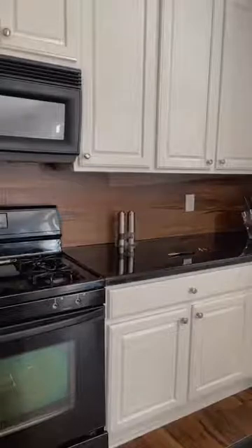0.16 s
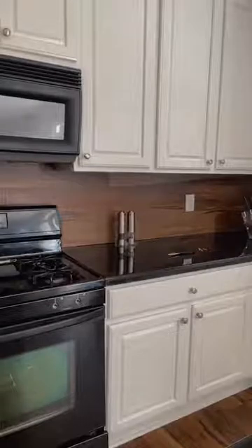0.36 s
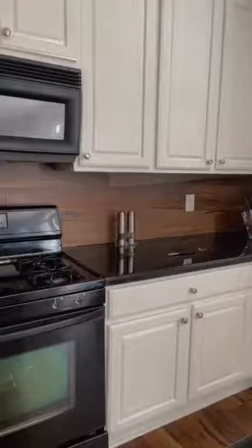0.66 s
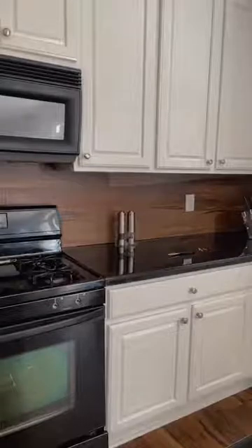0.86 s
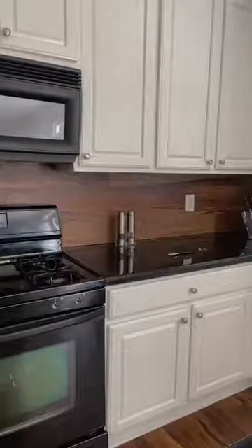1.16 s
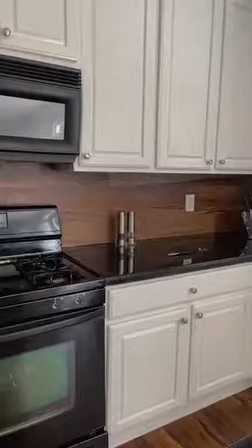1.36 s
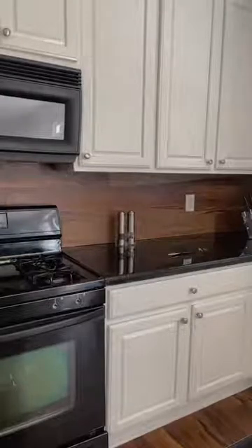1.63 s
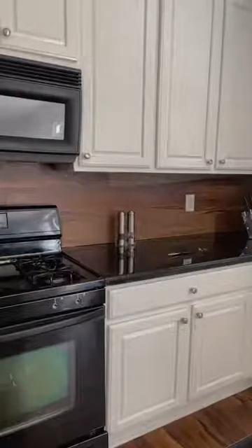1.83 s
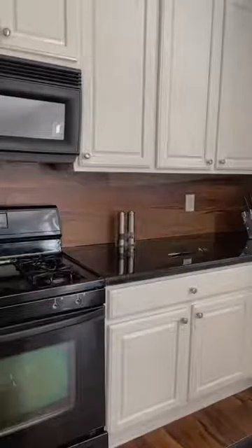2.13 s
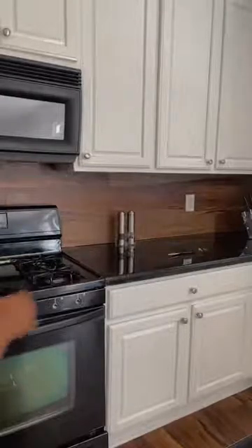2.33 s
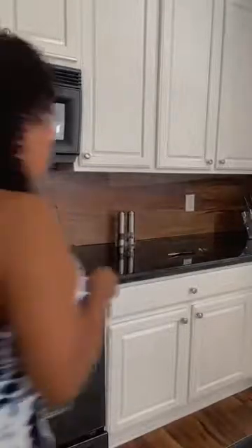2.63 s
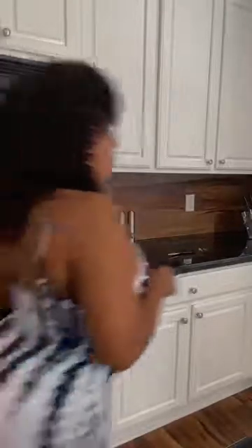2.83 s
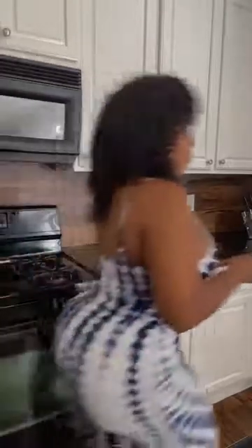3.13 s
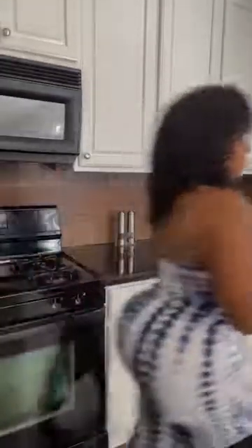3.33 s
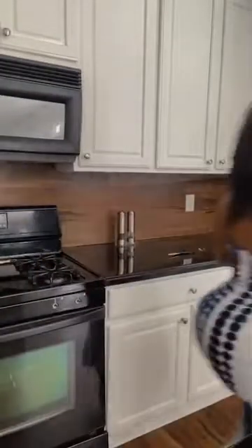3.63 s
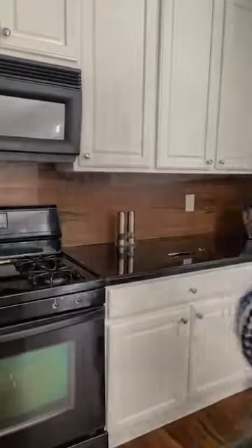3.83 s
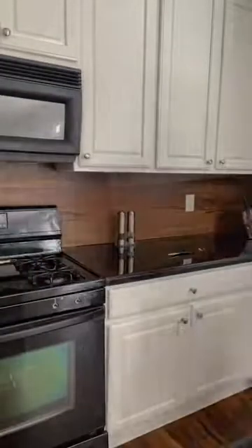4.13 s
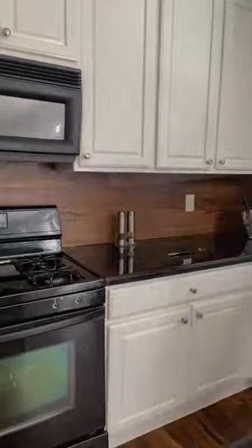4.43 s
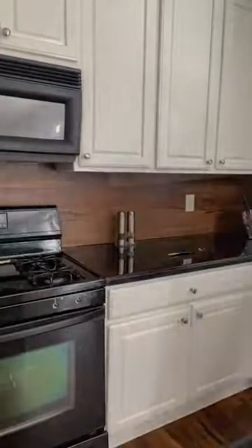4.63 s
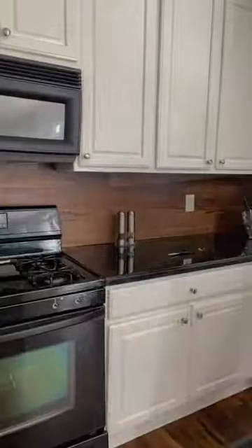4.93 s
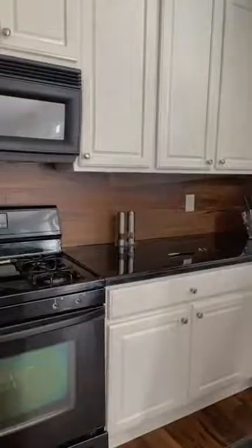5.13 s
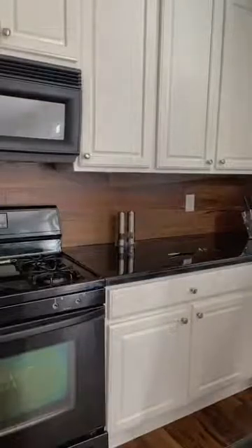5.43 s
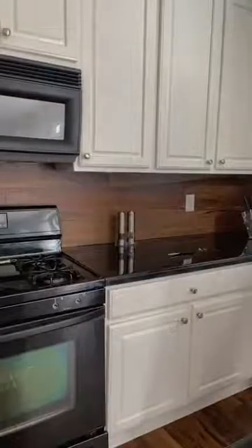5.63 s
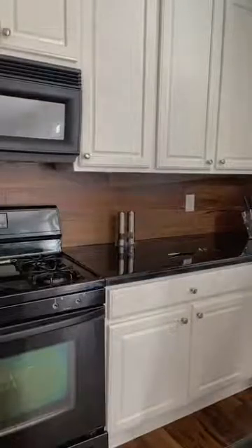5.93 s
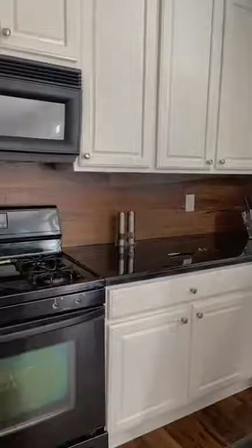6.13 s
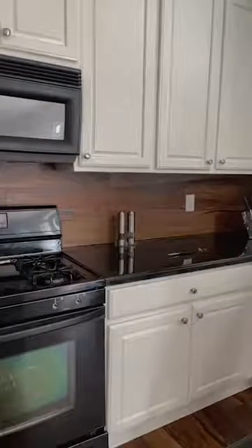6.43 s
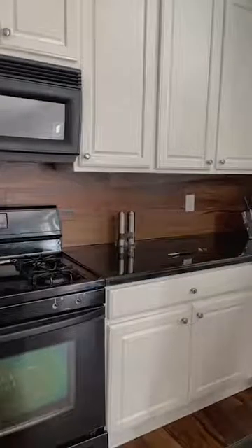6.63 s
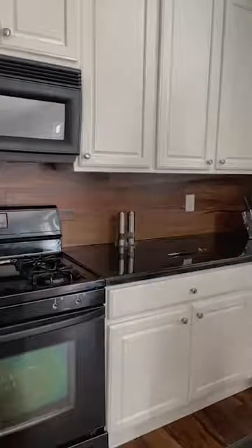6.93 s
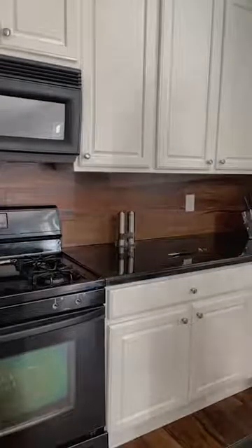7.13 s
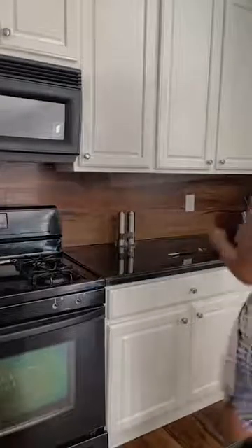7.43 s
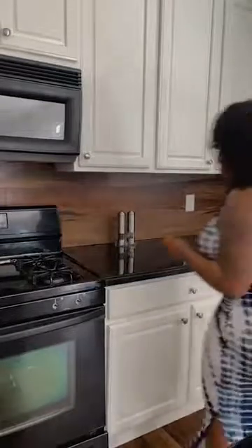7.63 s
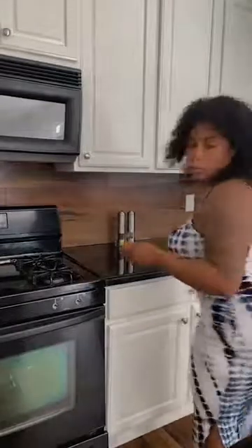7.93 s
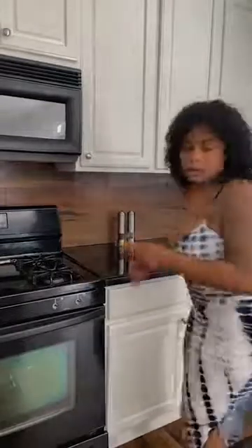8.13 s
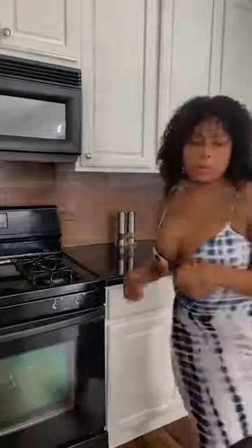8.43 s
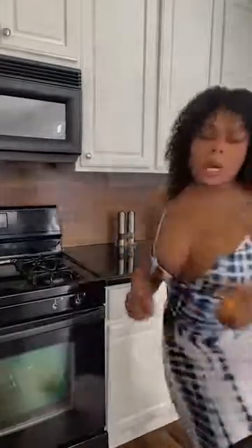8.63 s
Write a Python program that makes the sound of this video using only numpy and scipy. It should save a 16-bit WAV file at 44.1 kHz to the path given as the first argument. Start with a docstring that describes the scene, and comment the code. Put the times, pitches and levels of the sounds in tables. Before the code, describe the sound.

A door rattles at once, a hollow box is knocked over in a quick tumble, then two loud, bassy door bangs with rattling contact ring through a hard kitchen. Afterwards it falls nearly quiet: light slipper scuffs, a few airy swishes over a surface, faint metal chinks and small squeaky pips, over a low refrigerator hum and soft room air. The fixed microphone hears clear echo.

```python
"""A door rattles and a box is knocked over refrigerator hum and room air; two doors then bang and rattle.
Slippers walk about, something swishes over a surface, metal chinks faintly; short pips sound.
Doors and box: struck modes plus contact noise. Slippers and swishes: grainy noise, resonated.
Chinks and pips: noise-shaken decaying resonances. Hum: sine lines. Room air: coloured noise.
A hard-walled kitchen echoes all but the hum and the air."""
import sys
import numpy as np
from scipy import signal
from scipy.fft import rfft, irfft
from scipy.io import wavfile
from scipy.ndimage import uniform_filter1d

SR = 44100
rng = np.random.default_rng(int(sys.argv[2]) if len(sys.argv) > 2 else 0)


def waveform_to_disk(signal):
    """Save audio, clipped to [-1, 1], as 16-bit WAV at the path in sys.argv[1]."""
    frames = np.transpose(np.atleast_2d(signal))
    scaled = np.clip(frames, -1, 1) * 32767
    samples = np.round(scaled).astype(np.int16)
    wavfile.write(sys.argv[1], SR, samples)


N = 386310

# Spectrum levels are relative: coloured() sets the total to rms 1.
# door blows: start_s, push_db (relative), crack_re_push_db, rattle_s
DOOR_BLOWS = [(.002, -34.5, -6.5, 0.024), (0.037, -40, -6, 0.02), (0.091, -30.5, -14, 0.0062),
              (.126, -42, -17, 0.011), (.157, -42, -20, 0.0074), (.934, -26, 0.5, .026),
              (.952, -12.5, -10.5, 0.023), (.965, -15.5, -10.5, 0.014), (.986, -16.5, -11.5, 0.013),
              (.999, -22.5, -10, 0.0088), (1.033, -30.5, -18, 0.009), (1.049, -24.5, -16, 0.0082),
              (1.075, -27, -14, 0.011), (1.115, -33, -19, 0.011), (1.177, -39.5, 0, .016),
              (1.249, -35, -3.5, 0.018), (1.266, -25.5, -3.1, 0.016), (1.284, -29, 0.1, 0.028),
              (1.314, -21, -2, 0.0071), (1.335, -25, -2, .0059), (1.349, -33, 1, 0.0084),
              (1.389, -24.5, 0.8, 0.0068), (1.402, -26, -1.5, 0.011), (1.45, -42, -12, 0.011)]
# door panel modes: mode_hz, width_hz, level_db (relative)
PANEL_MODES = [(58, 52, 0), (89.5, 43, -2.5), (121.5, 28, 0), (198, 29, 0.5), (258, 53, -3),
               (325.6, 27.6, -1), (455, 50, -2.5), (509, 53, -0.5), (561, 26, 1.5), (799, 40, -5.5),
               (1294, 66, 0)]
# latch and edge contact spectrum: freq_hz, density_db_per_hz
CRACK_SPECTRUM = [(150, -9), (400, -3), (800, -4.5), (1300, -7.5), (2200, -8.5), (3500, -14), (7000, -22),
                  (9500, -25), (12000, -32.5), (15600, -36)]
# hollow knocks: start_s, strength_db, pitch_factor
BOX_KNOCKS = [(.222, -16.5, 1.03), (.284, -28.5, 1.24), (.327, -22.5, 1.07), (.412, -20, 0.577),
              (.41, -33.5, 1.78), (.47, -29, 1.01), (.475, -40.5, 1.84), (5.028, -34, 0.66)]
# box modes: mode_hz (before pitch_factor), level_db (relative), t60_s
BOX_MODES = [(328.7, 2, 0.098), (409.5, 7, 0.056), (589, -7, 0.071), (710, -13, 0.051), (1190, -21, 0.097)]
# slipper slaps and scuffs: start_s, strength_db, slap_hz, hiss_re_slap_db, hiss_hz, length_s
SLIPPER_STEPS = [(0.182, -68, 1500, -1.5, 11000, .01), (0.465, -52, 690, -9, 12000, 0.016),
                 (.593, -78, 900, 4.5, 14000, .015), (0.716, -64, 1600, 2, 5600, 0.019),
                 (1.58, -54, 900, 3, 8900, 0.017), (1.88, -58.5, 1330, 0.5, 6600, .016),
                 (2.192, -60, 1180, 0.5, 4540, 0.019), (2.272, -64, 845, 1, 5000, 0.012),
                 (2.444, -64, 1240, 4.5, 6750, 0.026), (2.866, -58.5, 1010, -8, 5130, 0.024),
                 (2.967, -65, 1170, -2, 4000, 0.021), (3.024, -48.5, 1400, 2, 3970, 0.007),
                 (3.414, -63, 1020, 2.5, 7900, 0.012), (3.433, -57, 800, -2.5, 5930, .013),
                 (3.453, -58.5, 1500, -3, 6200, 0.014), (3.529, -63.5, 2220, 1, 6840, .021),
                 (3.564, -65, 997, 7, 6000, 0.021), (3.717, -61, 750, -12, 4180, 0.01),
                 (3.958, -62, 820, -6.5, 3780, .036), (4.033, -61.5, 900, 0.5, 3560, .018),
                 (4.308, -58.5, 1320, 3, 3760, 0.019), (4.467, -71.5, 896, 5, 9000, 0.034),
                 (5.327, -59.5, 2500, 13, 9800, 0.013), (6.04, -49.5, 1400, -1, 4610, 0.0074),
                 (6.052, -50.5, 890, -2, 7340, 0.01), (6.597, -52, 990, -2.5, 4160, 0.007),
                 (6.876, -63, 988, -4.5, 8160, 0.012), (7.043, -62.5, 900, 9.5, 7340, 0.014),
                 (7.085, -67.5, 743, 5, 7300, 0.041), (7.136, -64, 1700, 2.5, 5660, 0.029),
                 (7.187, -60.5, 1200, 0.5, 7530, 0.015), (7.647, -60.5, 900, -1, 6960, 0.029),
                 (7.734, -71, 934, 15.5, 8000, 0.033), (7.827, -68, 1730, 16, 8080, .025),
                 (7.886, -81, 937, 15, 6970, 0.041), (8.085, -57.5, 980, 9, 6150, 0.018),
                 (8.202, -75.5, 864, 15, 7540, 0.023), (8.319, -64.5, 1320, 6.5, 8000, 0.025)]
# sliding sole spectrum: freq_hz, density_db_per_hz
SOLE_SPECTRUM = [(500, -5), (1500, -14.5), (3000, -2.5), (6800, -4.5), (9000, -4.5), (11000, -8.5),
                 (15600, -12.5)]
# strokes: start_s, rise_s, hold_s, fall_s, level_db, swell_over_hold_db,
#          rub_from_hz, rub_to_hz, fizz_re_rub_from_db, fizz_re_rub_to_db
STROKES = [(1.62, 0.05, 0.048, .08, -51.5, 3, 6800, 5300, 5.5, -13),
           (4.53, 0.053, 0.45, 0.16, -47.5, 3.5, 8000, 5530, -2.5, -25),
           (5.071, 0.055, 0.096, 0.15, -41.5, -5.5, 5300, 4800, -22, -24),
           (5.756, 0.064, 0.23, 0.011, -69.5, 8, 3380, 5360, -22, -20)]
# rubbed surface spectrum: freq_hz, density_db_per_hz
RUB_SPECTRUM = [(300, -6), (600, -14.5), (900, -9.5), (1550, -14), (1750, -6), (2050, -7), (2300, -7),
                (3000, -9.5), (4500, -5.5), (6800, -5.5), (9000, -6.5), (11000, -11), (15600, -17)]
# moments of pressure that scrape: start_s, level_db, length_s
SCRAPES = [(1.631, -56, 0.018), (4.872, -48.5, 0.032), (5.116, -45, 0.034), (5.268, -61, .04),
           (5.77, -65.5, .07)]
# metal chinks: start_s, strength_db, upper_re_lower_db
METAL_CHINKS = [(.6, -68, -12), (.64, -59, -4), (1.67, -64, 9), (1.712, -53, -7), (1.8, -60, -2)]
# lower and upper metal mode: mode_hz, width_hz, t60_s (of the envelope)
METAL_MODES = [(4430, 49, 0.18), (5380, 110, 0.23)]
# pips and squeaks: start_s, strength_db, pitch_hz, t60_s (of the envelope)
SHORT_PIPS = [(2.305, -54, 795, 0.1), (3.432, -50.5, 800, 0.12), (3.476, -60, 1750, .11),
              (5.335, -52.5, 3700, 0.42), (5.7, -60, 4000, 0.3), (5.984, -60, 5370, .3),
              (6.044, -46, 1790, 0.094), (6.046, -50, 1300, .09), (6.05, -43.5, 704, 0.066),
              (6.886, -58, 1110, 0.092)]
# motor lines: line_hz, amplitude_db (first line also follows LEVEL_CURVES)
MOTOR_LINES = [(59, -50), (36.5, -67), (73.6, -53.5), (120.3, -52), (157.7, -64), (179, -75.5),
               (237.6, -66.5), (294, -63), (581, -73)]
# level curves of the first hum line and of the room air, with rumble after the bangs:
#          time_s, first_line_gain_db, air_gain_db
LEVEL_CURVES = [(0, 10.5, 22), (.5, 8.5, 4), (.9, 8.5, 1.1), (1.101, -16, 19.5), (1.999, 2.5, 1.5),
                (4.5, 1, -1.04), (8.76, 2, 1.4)]
# room air spectrum: freq_hz, density_db_per_hz
AIR_SPECTRUM = [(15, -39), (30, -23), (60, -7.5), (100, 2), (200, -3.5), (260, -2), (320, -4), (400, -10),
                (600, -14), (1000, -17.5), (2200, -23), (4000, -25.5), (8500, -31), (10000, -38.5),
                (15600, -41)]
# room decay: freq_hz, t60_s
ROOM_DECAY = [(60, 0.59), (250, 0.58), (700, 0.74), (1800, 0.78), (4600, 0.68), (12000, 0.51)]

CONTACT_AREA_S2 = 5.5e-6  # contact s x rattle s: a dead blow dwells longer
BANG_RISE_SHARE, STEP_RISE_SHARE, SCRAPE_RISE_SHARE = .17, 0.59, 0.34  # of the length
PANEL_DB, TICK_DB, AIR_DB = 24, -25.5, -57
STROKE_END_DB = -22.5  # stroke ends against the adjacent end of the hold
EDGE_HZ = 15740


def doors():
    """Each blow pushes the panel once, shakes its modes and adds a bright crack; long contact moves more bass."""
    force, crack = np.zeros(N), np.zeros(N)
    for start_s, push_db, crack_db, rattle_s in DOOR_BLOWS:
        shape = burst(BANG_RISE_SHARE * rattle_s, rattle_s)
        contact_s = CONTACT_AREA_S2 / rattle_s
        push = 2.28 * burst(contact_s, contact_s)
        shake = shape * gritty(8192, 0.35)
        add(force, start_s, gain_of(push_db) * (push + shake))
        contact_noise = coloured(gritty(8192, 2.4), CRACK_SPECTRUM)
        add(crack, start_s, gain_of(push_db + crack_db) * shape * contact_noise)
    panel = np.zeros(N)
    for k, (mode_hz, width_hz, level_db) in enumerate(PANEL_MODES):
        mode = resonate(force, mode_hz, width_hz) / np.sqrt(abs(width_hz))
        panel += (-1) ** k * gain_of(level_db) * mode
    highpass = signal.butter(2, 42, "high", fs=SR, output="sos")
    return signal.sosfilt(highpass, gain_of(PANEL_DB) * panel + crack)


def knocks():
    """Each tap rings the decaying modes of a hollow box and adds a noise tick."""
    out, t = np.zeros(N), np.arange(8192) / SR
    onset = (1 - np.exp(-t / .011)) ** 2
    for start_s, strength_db, pitch in BOX_KNOCKS:
        ring = np.zeros(len(t))
        for mode_hz, level_db, t60_s in BOX_MODES:
            wave = np.sin(2 * np.pi * (mode_hz * pitch * t + rng.random()))
            ring += gain_of(level_db - 60 * t / t60_s) * wave
        noise = coloured(rng.standard_normal(len(t)), CRACK_SPECTRUM)
        tick = gain_of(TICK_DB) * burst(0.00034, 0.014) * noise
        add(out, start_s, gain_of(strength_db) * (ring * onset + tick))
    return out


def steps():
    """The sole slaps with a broad mid resonance and hisses as it slides; a light sole moves no bass."""
    out = np.zeros(N)
    for start_s, strength_db, slap_hz, hiss_db, hiss_hz, length_s in SLIPPER_STEPS:
        slap = resonate_twice(gritty(8192, 4.9), slap_hz, 1.3 * slap_hz)
        hiss = coloured(gritty(8192, 2.1), SOLE_SPECTRUM)
        hiss = evened(hiss + 1.4 * resonate(hiss, hiss_hz, 0.58 * hiss_hz))
        shape = burst(STEP_RISE_SHARE * length_s, length_s)
        add(out, start_s, gain_of(strength_db) * shape * (slap + gain_of(hiss_db) * hiss))
    return signal.sosfilt(signal.butter(4, 520, "high", fs=SR, output="sos"), out)


def swishes():
    """Dense friction grains: a broad resonance glides with the stroke while light contact fizzes."""
    out = np.zeros(N)
    for (start_s, rise_s, hold_s, fall_s, level_db, swell_db,
         from_hz, to_hz, fizz_from_db, fizz_to_db) in STROKES:
        t = np.arange(0, rise_s + hold_s + fall_s, 1 / SR)
        way = t / t[-1]
        corners_s = np.cumsum([0, rise_s, hold_s, fall_s])
        stroke_db = np.interp(t, corners_s, [STROKE_END_DB, 0, swell_db, swell_db + STROKE_END_DB])
        rub = coloured(gritty(len(t), 1.0), RUB_SPECTRUM)
        centre_hz = from_hz + (to_hz - from_hz) * way
        rub = evened(rub + 1.15 * resonate(rub, centre_hz, 3700))
        fizz = resonate_twice(gritty(len(t), 1.0), 13000, 5400)
        fizz_db = fizz_from_db + (fizz_to_db - fizz_from_db) * way
        stroke = gain_of(level_db + stroke_db) * (rub + gain_of(fizz_db) * fizz)
        add(out, start_s, stroke * signal.windows.tukey(len(t), .08))
    return out


def scrapes():
    """Pressure scrapes: a burst of gritty noise in a resonance at 3200 Hz."""
    out = np.zeros(N)
    for start_s, level_db, length_s in SCRAPES:
        scrape = resonate_twice(gritty(8192, 2.3), 3200, 1260)
        add(out, start_s, gain_of(level_db) * burst(SCRAPE_RISE_SHARE * length_s, length_s) * scrape)
    return out


def chinks():
    """Two metal modes ring and flutter at each chink."""
    out = np.zeros(N)
    for start_s, strength_db, upper_db in METAL_CHINKS:
        lower, upper = flutter(*METAL_MODES[0]), flutter(*METAL_MODES[1])
        add(out, start_s, gain_of(strength_db) * (lower + gain_of(upper_db) * upper))
    return out


def pips():
    """Each pip is one fluttering resonance, wider at higher pitch."""
    out = np.zeros(N)
    for start_s, strength_db, pitch_hz, t60_s in SHORT_PIPS:
        add(out, start_s, gain_of(strength_db) * flutter(pitch_hz, 51 + .09 * pitch_hz, t60_s))
    return out


def fridge_hum():
    """Slightly wavering motor lines; the level of the first line dips after the bangs."""
    t = np.arange(N) / SR
    time_s, first_line_db, _ = np.transpose(LEVEL_CURVES)
    lines = []
    for line_hz, level_db in MOTOR_LINES:
        wave = np.sin(2 * np.pi * (line_hz * t + rng.random()))
        lines.append(gain_of(level_db + 0.69 * wander()) * wave)
    return lines[0] * gain_of(np.interp(t, time_s, first_line_db)) + sum(lines[1:])


def room_air():
    """Coloured noise for the room air, raised at the start and as rumble after the bangs."""
    time_s, _, air_db = np.transpose(LEVEL_CURVES)
    level_db = AIR_DB + np.interp(np.arange(N) / SR, time_s, air_db)
    return coloured(rng.standard_normal(N), AIR_SPECTRUM) * gain_of(level_db)


def kitchen(x):
    """Echo of random-sign taps, each band with its own decay; three tails are driven in rotation at 11 Hz."""
    out, at = np.zeros(N), np.arange(200, SR - 20, 20)
    for k in range(3):
        taps = np.zeros(SR)
        taps[at + rng.integers(0, 20, len(at))] = rng.choice([-1., 1.], len(at))
        hz, t, bands = signal.stft(taps, SR, nperseg=256)
        decay = gain_of(-60 * t / read(ROOM_DECAY, hz)[:, None])
        tail = signal.istft(bands * decay, SR, nperseg=256)[1]
        turn = np.sqrt(2 / 3) * np.cos(2 * np.pi * (11 * np.arange(N) / SR + k / 3))
        out += signal.fftconvolve(x * turn, tail / np.linalg.norm(tail))[:N]
    return out


def flutter(hz, width_hz, t60_s):
    """A narrow resonance, shaken by noise so that it flutters as it dies."""
    t = np.arange(SR // 2) / SR
    ring = resonate(rng.standard_normal(len(t)), hz, width_hz)
    ring = evened(resonate(ring, hz, 2 * width_hz))
    return gain_of(-60 * t / t60_s) * ring * (1 - np.exp(-t / 0.0013))


def burst(rise_s, length_s, size=8192):
    """Envelope of a contact: the pressure builds, then falls exponentially; top 1."""
    t = np.arange(size) / SR
    shape = (1 - np.exp(-t / rise_s)) ** 2 * np.exp(-t / length_s)
    return shape / shape.max()


def gritty(size, grit_db):
    """Noise in uneven grains about 40 samples long, rms 1."""
    grains = evened(uniform_filter1d(rng.standard_normal(size), 40))
    return evened(rng.standard_normal(size) * gain_of(grit_db * grains))


def wander():
    """Slow random drift up to 5 Hz, near rms 1, held for 64 samples at a time."""
    t = np.arange(N // 64 + 1) * 64 / SR
    waves = [np.sin(2 * np.pi * (hz * t + rng.random())) / np.sqrt(hz)
             for hz in np.geomspace(.2 / 64, 5, 12)]
    return evened(sum(waves)).repeat(64)[:N]


def resonate(x, hz, width_hz):
    """Resonance: shifts hz (number or curve) down to zero, smooths, and shifts back."""
    turn = np.exp(2j * np.pi * np.cumsum(hz * np.ones(len(x))) / SR)
    r = np.exp(-np.pi * abs(width_hz) / SR)
    return 2 * (turn * signal.lfilter([1 - r], [1, -r], x / turn)).real


def resonate_twice(x, hz, width_hz):
    """Two equal resonances in series for steeper skirts, rms 1."""
    return evened(resonate(resonate(x, hz, width_hz), hz, width_hz))


def coloured(x, spectrum):
    """Gives a noise a spectrum, rms 1."""
    level_db = read(spectrum, np.fft.rfftfreq(len(x), 1 / SR))
    return evened(irfft(rfft(x) * gain_of(level_db), len(x)))


def read(points, hz):
    """Reads a curve on a log-frequency axis."""
    f, value = np.transpose(points)
    return np.interp(np.log(hz + 1), np.log(f + 1), value)


def evened(x):
    """Scales to rms 1."""
    return x / np.sqrt(np.mean(x ** 2) + 1e-20)


def gain_of(db):
    """Decibels to gain."""
    return 10 ** (np.asarray(db) / 20)


def add(mix, start_s, sound):
    """Mixes a sound in at a time, cut at the end of the mix."""
    part = mix[max(round(start_s * SR), 0):][:len(sound)]
    part += sound[:len(part)]


def scene():
    """Direct sound plus kitchen echo for all sources but the hum and the air, which are direct only."""
    door, box, foot = doors(), knocks(), steps()
    small = swishes() + scrapes() + chinks() + pips()
    box = box + kitchen(gain_of(-8) * box)
    echo = kitchen(gain_of(-1) * door + gain_of(-2.0) * foot + gain_of(-3) * small)
    return (door + box + foot + small + echo + fridge_hum() + room_air())[None]


def record(dry):
    """The band limit of the recorder: a steep low-pass at EDGE_HZ."""
    lowpass = signal.firwin(2047, EDGE_HZ, window=("kaiser", 9), fs=SR)
    return signal.oaconvolve(dry, lowpass[None], "same")


dry = scene()
out = record(dry)
waveform_to_disk(out)
```